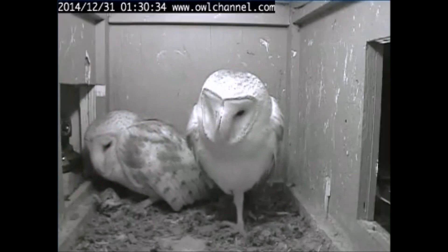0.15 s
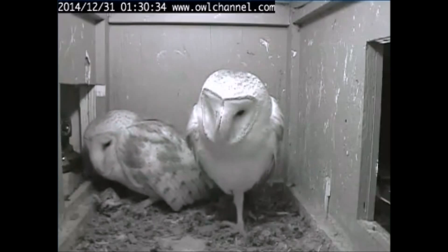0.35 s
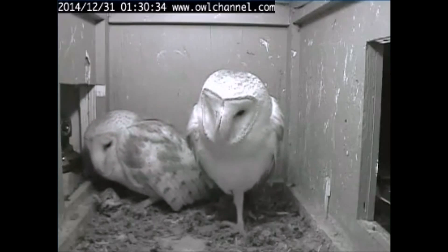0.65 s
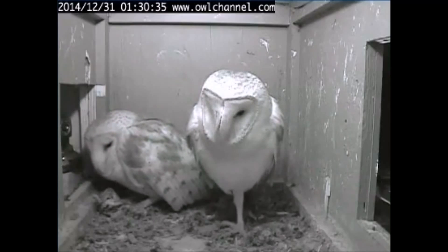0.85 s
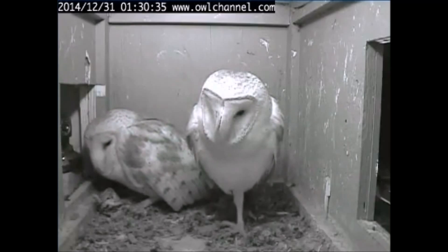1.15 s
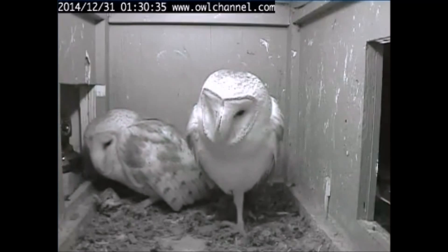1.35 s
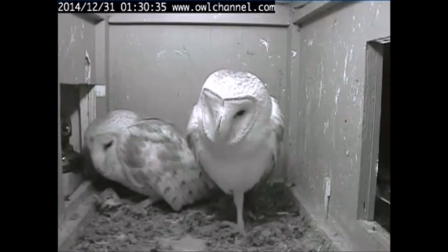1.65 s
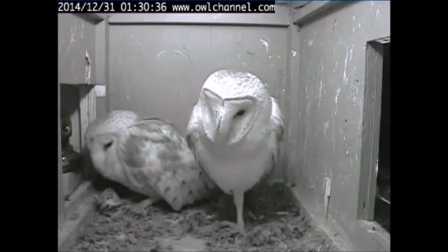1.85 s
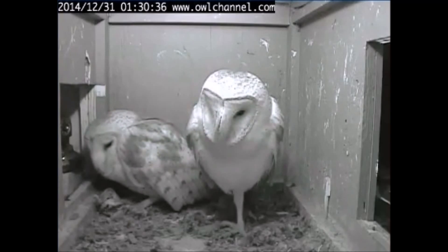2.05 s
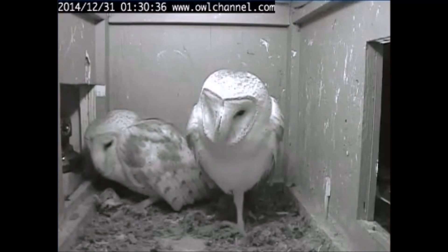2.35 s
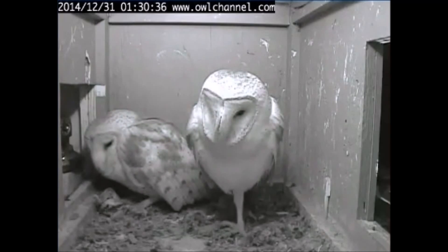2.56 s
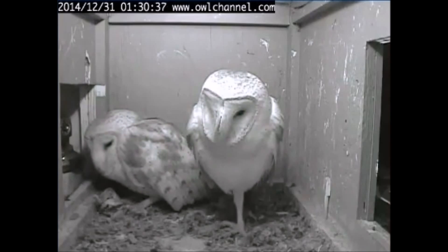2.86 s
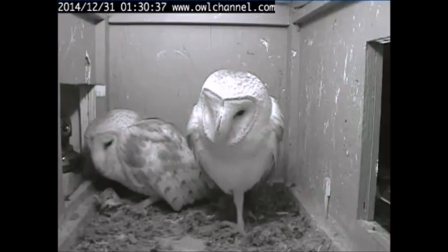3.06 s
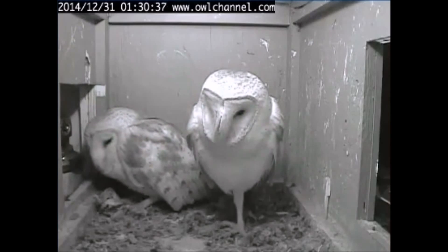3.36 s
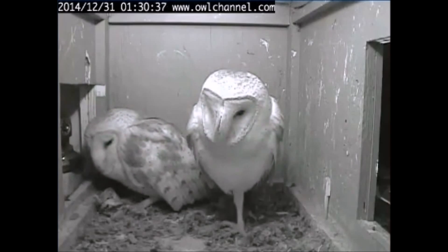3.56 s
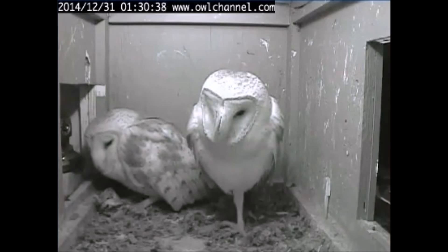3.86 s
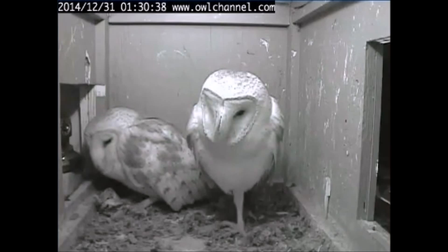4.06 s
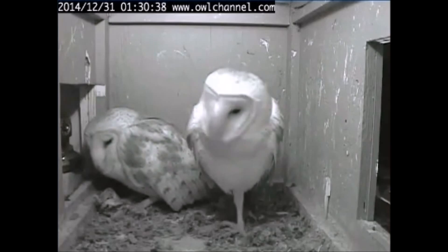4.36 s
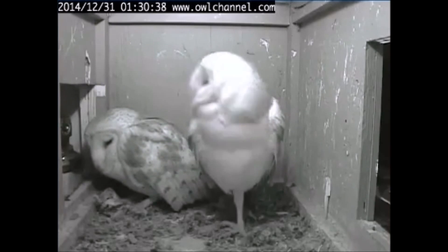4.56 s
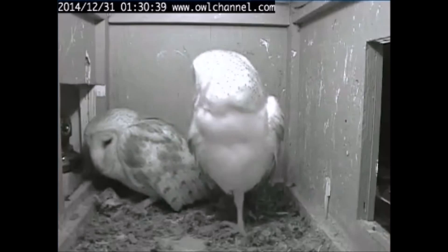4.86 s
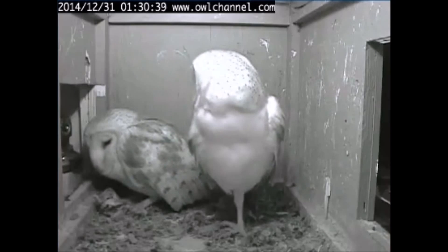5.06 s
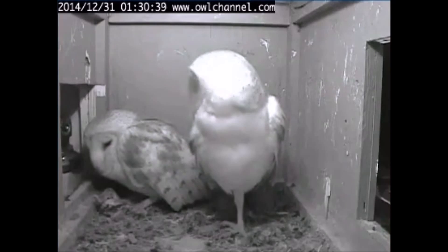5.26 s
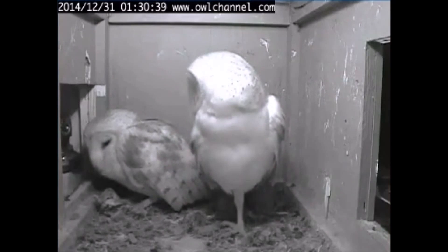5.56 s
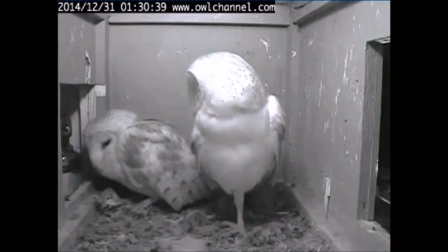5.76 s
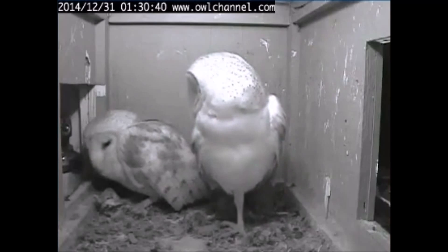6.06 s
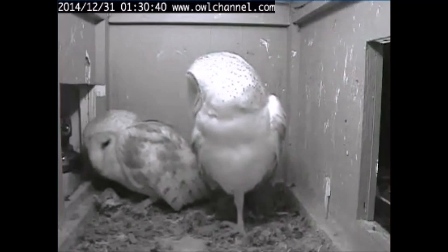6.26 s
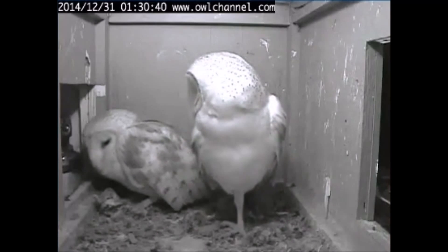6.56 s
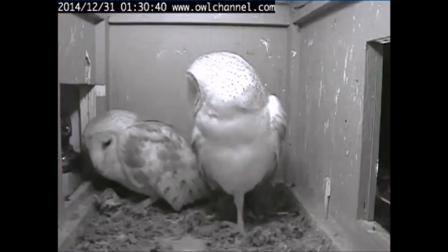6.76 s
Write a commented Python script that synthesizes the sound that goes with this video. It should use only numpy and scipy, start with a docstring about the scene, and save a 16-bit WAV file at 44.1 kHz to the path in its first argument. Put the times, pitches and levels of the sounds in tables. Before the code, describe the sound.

Barn owls call in a small wooden nest box that gives each sound a brief ring. Faint distant traffic and a low rumble run underneath throughout, swelling gently. A tiny squeak sounds at the very start. Three short calls follow at about 0.5, 1.3 and 2.2 seconds, each a thin, high, wavering whistle that breaks into a harsh breathy rasp and ends in a falling squeak; the third is mostly rasp. From 2.6 to 4.2 seconds only the background remains. Two louder rising whistles come at about 4.2 and 5.1 seconds, each ending in a quick downward squeak, the second peaking sharply near 5.5. At 5.9 a whistle with a strong rasp in its middle ends in another squeak. A last rasp runs from 6.7 seconds to the end, near 7. The microphone has little high treble and overloads slightly on the loudest peaks.

```python
"""Barn owls call in a small wooden nest box at night, with far traffic and a low rumble behind them.
A short squeak comes first. Three calls follow, each a whistle that breaks into a harsh rasp and ends
in a falling squeak. After a pause come two rising whistles and a mixed call, each ending in a squeak,
then one last rasp. The owls' breath shakes thin membranes in the throat, and the air in the box rings.
A narrow-band microphone feeds a recorder that overloads on the loudest peaks."""
import sys
import numpy as np
from scipy import signal
from scipy.fft import rfft, irfft, next_fast_len
from scipy.io import wavfile
from scipy.ndimage import uniform_filter1d

SR = 44100
rng = np.random.default_rng(int(sys.argv[2]) if len(sys.argv) > 2 else 0)


def store_wav(level_fs):
    """Save 16-bit WAV to argv[1]."""
    pcm = np.round(np.clip(np.atleast_2d(level_fs), -1, 1) * 32767)
    wavfile.write(sys.argv[1], SR, pcm.T.astype(np.int16))


N = 305172
TIME_S = np.arange(N) / SR
FADED_DB = -27.5   # how much quieter a note is at its faded ends


def amp(db):
    """Turn decibels into a number to multiply a sound by."""
    return 10 ** (np.asarray(db) / 20)


def unit_power(x):
    """Scale a sound so that its average power is 1."""
    return x / np.sqrt(np.mean(x ** 2) + 1e-20)


def gain_at(spectrum, hz):
    """Look up the gain at a pitch in rows of (pitch_hz, level_db); every octave is equally wide."""
    pitch_hz, level_db = np.transpose(spectrum)
    return amp(np.interp(np.log(hz + 1e-3), np.log(pitch_hz), level_db))


def filtered(x, response):
    """Turn each frequency of a sound up or down by response(hz)."""
    size = next_fast_len(N + SR // 4)
    hz = np.arange(size // 2 + 1) * SR / size
    return irfft(rfft(x, size) * response(hz), size)[:N]


def noise(spectrum):
    """Noise of power 1; the spectrum sets only its tone colour."""
    return unit_power(filtered(rng.standard_normal(N), lambda hz: gain_at(spectrum, hz)))


def drift(rate_hz):
    """A smooth random wobble about 1 in size; a higher rate wobbles faster."""
    pole = np.exp(-2 * np.pi * rate_hz / SR)
    return unit_power(signal.lfilter([1], [1, -2 * pole, pole * pole], rng.standard_normal(N + SR))[SR:])


# How loud the traffic is over time: time_s, wash_db, tyre_db
TRAFFIC_LEVELS = [(0, -33.5, -41), (.7, -30.5, -37.5), (1.7, -33, -42), (2.4, -33.5, -38), (3.6, -30, -37),
                  (4.3, -31.5, -40.5), (5.9, -34, -39), (6.92, -29.5, -40)]
# Tone colours of the traffic's wash, tyre hiss, drone and rumble: pitch_hz, level_db
WASH_COLOUR = [(190, -51), (330, -23), (386, -19.5), (471, -13.5), (556, -1), (637, -8), (799, -10.5),
               (904, -4), (989, 2.5), (1130, -1.5), (1220, -12.5), (1360, 1.5), (1700, -13), (2210, -43.5),
               (3740, -120)]
TYRE_COLOUR = [(1000, -31), (1700, -9), (1870, -2.5), (1970, 0), (2060, -10.5), (2240, -4.5), (2390, -16),
               (2800, -12.5), (2970, -15), (3130, -13), (3350, -17), (3960, -39.5), (4470, -44.5),
               (5810, -82.5), (9830, -120)]
DRONE_COLOUR = [(65, -34), (110, -5), (124, -7), (200, -2), (291, -8.5), (328, -10.5), (382, -1),
                (480, -4.5), (620, -35.5), (1060, -120)]
RUMBLE_COLOUR = [(7.1, -61), (12, -23.5), (27, -17.5), (54, 1.5), (70, 6), (89, 3), (119, -28), (130, -9.5),
                 (170, -67), (290, -120)]
def far_traffic():
    """Traffic and a deep rumble come through the walls as four noises that slowly swell."""
    time_s, wash_db, tyre_db = np.transpose(TRAFFIC_LEVELS)
    wash = amp(np.interp(TIME_S, time_s, wash_db) + 1.1 * drift(1.9)) * noise(WASH_COLOUR)
    tyres = amp(np.interp(TIME_S, time_s, tyre_db) + 0.84 * drift(5.8)) * noise(TYRE_COLOUR)
    drone = amp(-45 + 0.6 * TIME_S) * noise(DRONE_COLOUR)   # grows 0.6 dB each second
    rumble = amp(-32 + 1.2 * drift(2.1)) * noise(RUMBLE_COLOUR)
    return wash + tyres + drone + rumble


# The overtone one octave up, strong in low notes and faint in high ones: pitch_hz, overtone_db
OVERTONE = [(1300, 5), (1850, -10), (2150, -28)]
TAUT_HZ = 2510   # below this pitch the membranes are slack: they tremble more and leak more air
def owl_voice(notes, breath_colour, tremble, wobble_hz, flutter_db):
    """Membranes swing as air hisses past. A note is a list of (time_s, pitch_hz, tone_db, breath_db)."""
    time_s, *columns = np.transpose(np.concatenate(notes))
    curves = [np.interp(TIME_S, time_s, column) for column in columns]
    hz, tone_db, breath_db = [uniform_filter1d(c, SR // 250) for c in curves]   # muscles need 4 ms
    sounding = sum((TIME_S >= note[0][0]) & (TIME_S < note[-1][0]) for note in notes)
    on_off = uniform_filter1d(np.minimum(sounding, 1.), int(0.0047 * SR), mode="nearest")   # soft edges
    pitch_wobble = tremble * (TAUT_HZ / hz) ** 2 * drift(wobble_hz)
    phase = 2 * np.pi * np.cumsum(hz * (1 + pitch_wobble)) / SR
    tone = np.sin(phase) + gain_at(OVERTONE, hz) * np.sin(2 * phase)
    flutter = amp(flutter_db * np.tanh(drift(wobble_hz)))
    breath = amp(breath_db) * noise(breath_colour)
    return on_off * flutter * (np.sqrt(2) * amp(tone_db) * tone + breath)


# Tone colour of the breath in squeaks and rasps: pitch_hz, level_db
HARSH_BREATH = [(1000, -48.5), (1300, -20.5), (1800, 5), (2600, 6), (3500, -2.5), (5000, -3.5)]
# Falling squeaks: start_s, length_s, top_hz, bottom_hz, level_db, breath_db
SQUEAK_NOTES = [(0, 0.037, 1640, 1347, -20, -24.5), (.87, .07, 1747, 1592, -31.5, -33),
                (1.626, .06, 1725, 1460, -22, -36), (2.5, .072, 1800, 1331, -21, -33.5),
                (4.547, .062, 2682, 1603, -21, -19.5), (5.458, 0.047, 2442, 1335, -10, -21),
                (6.251, .053, 2485, 1317, -15, -29)]
def squeaks():
    """The pitch drops, with most breath half-way down, then rests low and fades."""
    fall_share, sag_db = .72, -5.5
    notes = []
    for start_s, length_s, top_hz, bottom_hz, db, breath_db in SQUEAK_NOTES:
        fall_s = fall_share * length_s
        notes.append([(start_s, top_hz, db, breath_db + FADED_DB / 2),
                      (start_s + fall_s / 2, (top_hz + bottom_hz) / 2, db + sag_db / 2, breath_db),
                      (start_s + fall_s, bottom_hz, db + sag_db, breath_db + FADED_DB / 2),
                      (start_s + length_s, bottom_hz, db + FADED_DB, breath_db + FADED_DB)])
    return owl_voice(notes, HARSH_BREATH, tremble=.022, wobble_hz=200, flutter_db=3.5)


# Tone colour of the breath in whistles: pitch_hz, level_db
SOFT_BREATH = [(1500, -12.5), (2000, -3.5), (2900, -0.5), (3300, 4.5), (3650, 9), (5000, -6.5)]
# Whistles, one list of points for each: time_s, pitch_hz, level_db
WHISTLE_NOTES = [
    [(.53, 2228, -22.5), (.545, 2204, -17), (.56, 2102, -19.5), (.578, 2103, -16.5), (.595, 2270, -22),
     (.66, 2330, -23.5), (.69, 2290, -21), (.72, 2250, -27), (.87, 2450, -25)],
    [(1.315, 2465, -22), (1.33, 2520, -15.5), (1.35, 2650, -30.5), (1.37, 2541, -19.5), (1.41, 2550, -27.5),
     (1.45, 2400, -33.5), (1.5, 2445, -22.5), (1.58, 2490, -33)],
    [(2.198, 2473, -24.5), (2.218, 2499, -27)],
    [(4.23, 1920, -30), (4.265, 2107, -22), (4.285, 2116, -16.5), (4.33, 2400, -25), (4.36, 2509, -20),
     (4.39, 2540, -23), (4.45, 2492, -19), (4.472, 2556, -11), (4.49, 2670, -19.5), (4.542, 2883, -16.5)],
    [(5.125, 2461, -18), (5.14, 2525, -15), (5.16, 2450, -20), (5.21, 2492, -14), (5.228, 2440, -24.5),
     (5.243, 2550, -18.5), (5.27, 2498, -25.5), (5.35, 2540, -12.5), (5.405, 2770, -10.5),
     (5.42, 2750, -11.5), (5.432, 2850, -9), (5.446, 2870, -8), (5.461, 2536, -5)],
    [(5.912, 2447, -27), (5.93, 2492, -25.5), (5.955, 2390, -34.5), (5.985, 2336, -18.5),
     (6.005, 2509, -32.5), (6.06, 2536, -25), (6.09, 2487, -17), (6.16, 2574, -18), (6.19, 2724, -21),
     (6.238, 2762, -21.5), (6.253, 2524, -14)],
]
def whistles():
    """Each whistle scoops up with a puff of air, follows its points and fades."""
    fade_in_s, fade_out_s, scoop_hz = .017, .016, 179.9
    puff_db, puff_s, leak_db_per_khz = 10.5, .018, 13.5
    notes = []
    for points in WHISTLE_NOTES:
        (start_s, first_hz, first_db), (end_s, last_hz, last_db) = points[0], points[-1]
        average_db = np.mean(points, axis=0)[2]
        breath_db = -51 + 2.5 * (average_db + 20)   # louder notes leak more breath
        note = [(start_s - fade_in_s, first_hz - scoop_hz, first_db + FADED_DB, breath_db + puff_db)]
        for time_s, hz, db in points:
            puff_left_db = puff_db * np.exp((start_s - time_s) / puff_s)
            leak_db = leak_db_per_khz * max(TAUT_HZ - hz, 0) / 1e3
            note.append((time_s, hz, db, breath_db + puff_left_db + leak_db))
        note.append((end_s + fade_out_s, last_hz, last_db + FADED_DB, breath_db))
        notes.append(note)
    return owl_voice(notes, SOFT_BREATH, tremble=.017, wobble_hz=120, flutter_db=3.6)


# Clean slides that join the whistles: start_s, length_s, from_hz, to_hz, level_db
SECOND_NOTES = [(0.567, 0.034, 2340, 2440, -22.5), (1.329, .095, 2270, 2337, -28.5),
                (4.3, .035, 2200, 2022, -26.5), (4.43, .115, 2560, 2920, -23),
                (5.243, .19, 2670, 2933, -20), (6.005, 0.078, 2420, 2462, -19),
                (6.16, .085, 2620, 2497, -23)]
def second_voice():
    """The other half of the voice box joins in, a little apart in pitch."""
    fade_s = .005
    notes = []
    for start_s, length_s, from_hz, to_hz, db in SECOND_NOTES:
        end_s = start_s + length_s
        times = [start_s, start_s + fade_s, end_s - fade_s, end_s]
        pitches = np.interp(times, [start_s, end_s], [from_hz, to_hz])
        edge_db, breath_db = db + FADED_DB / 2, db + 2 * FADED_DB
        notes.append(list(zip(times, pitches, [edge_db, db, db, edge_db], [breath_db] * 4)))
    return owl_voice(notes, SOFT_BREATH, tremble=.018, wobble_hz=120, flutter_db=3.4)


# Rasps, one list of points for each: time_s, pitch_hz, breath_db
RASP_NOTES = [
    [(.697, 1850, -18.5), (.731, 1720, -22), (.785, 1855, -23), (.815, 1828, -22), (.87, 1850, -26),
     (.91, 1696, -27)],
    [(1.422, 1528, -18.5), (1.446, 1707, -23), (1.515, 1810, -23.5), (1.55, 1838, -15), (1.6, 1839, -19.5),
     (1.632, 1719, -21)],
    [(2.217, 1725, -16.5), (2.26, 1776, -20), (2.305, 1834, -21), (2.35, 1760, -13.5), (2.38, 1820, -21.5),
     (2.43, 1835, -15), (2.51, 1820, -18.5), (2.53, 1693, -27)],
    [(6.065, 1770, -11.5), (6.072, 1748, -6.5), (6.084, 1740, -15.5), (6.094, 1706, -2.5),
     (6.112, 1703, -14.5), (6.128, 1813, -9), (6.16, 1775, -33)],
    [(6.655, 1733, -17), (6.675, 1690, -11), (6.72, 1630, -15), (6.748, 1606, -7), (6.758, 1622, -15),
     (6.768, 1600, -8), (6.785, 1630, -15.5), (6.834, 1700, -14), (6.885, 1717, -14.5), (6.92, 1720, -11)],
]
def rasps():
    """The owl pushes air hard; the tone starts buried in breath and slowly clears."""
    fade_in_s, fade_out_s = .0035, .02
    clearing_db = [-8, -1]   # the tone compared with the breath, at the start and the end
    notes = []
    for points in RASP_NOTES:
        (start_s, first_hz, first_db), (end_s, last_hz, last_db) = points[0], points[-1]
        opening = (start_s - fade_in_s, first_hz, first_db + FADED_DB, first_db + FADED_DB)
        body = [(s, hz, db + np.interp(s, [start_s, end_s], clearing_db), db) for s, hz, db in points]
        ending = (end_s + fade_out_s, last_hz, last_db + FADED_DB, last_db + FADED_DB)
        notes.append([opening, *body, ending])
    return owl_voice(notes, HARSH_BREATH, tremble=.012, wobble_hz=170, flutter_db=2.0)


# Where the air in the box rings: pitch_hz
RING_PITCHES = [1340, 1625, 1715, 1915, 2100, 2270, 2510, 2680, 2840, 2940, 3270, 3490, 4420]
# The shape of each of those rings: width_hz, boost_db
RING_SHAPES = [(60, 9), (50, 7.5), (50, -3), (49, 9.5), (45, 3), (55.6, 5.5), (55.3, 5.5), (49.4, -6.5),
               (58.6, -1), (53, 3.4), (64.6, 7.5), (44, -2), (162, 27)]
def nest_box(hz):
    """The box's response: its air rings briefly at certain pitches and boosts them."""
    boosts = [1 + amp(boost_db) / (1 + 2j * (hz - pitch_hz) / width_hz)
              for pitch_hz, (width_hz, boost_db) in zip(RING_PITCHES, RING_SHAPES)]
    return amp(-7.0) * np.prod(boosts, axis=0)


# How much of each pitch the microphone lets through: pitch_hz, gain_db
MICROPHONE_BAND = [(3650, 0), (3740, -6), (3810, -29), (4300, -31), (4650, -33), (4900, -50), (5300, -80)]
def microphone(sound, limit=1.1):
    """The microphone rounds off loud peaks, then loses the high treble."""
    rounded = limit * np.tanh(sound / limit)
    return filtered(rounded, lambda hz: gain_at(MICROPHONE_BAND, hz))


def scene():
    """The calls ring in the box and pass the microphone; traffic is added. Left and right are alike."""
    calls = whistles() + second_voice() + rasps() + squeaks()
    in_box = filtered(calls, nest_box)
    return np.tile(microphone(in_box) + far_traffic(), (2, 1))


# Faint copies moved in pitch: shift_hz, direction (+1 upright, -1 mirrored), gain_db
SHIFTED_COPIES = [(5292, 1, -58), (10584, 1, -60), (14112, -1, -57), (17640, -1, -63)]
def converter_copies(sound):
    """The sample-rate converter leaves faint shifted copies of the sound."""
    shiftable = signal.hilbert(sound, next_fast_len(N))[:N]
    return sum(amp(db) * (shiftable * np.exp(2j * np.pi * direction * shift_hz * TIME_S)).real
               for shift_hz, direction, db in SHIFTED_COPIES)


# Tone colour of the faint hiss that follows the loudness: pitch_hz, level_db
HISS_COLOUR = [(250, -62), (600, -40), (1200, -31.5), (2000, -1.5), (3500, -4), (4500, -12.5),
               (5500, -26.5), (15000, -37)]
def following_hiss(sound):
    """A faint hiss, separate in each channel, that rises and falls with the sound's loudness."""
    loudness = 1.6 * np.sqrt(uniform_filter1d(sound ** 2, SR // 50) + 1e-12)
    return amp(-30) * loudness * np.array([noise(HISS_COLOUR), noise(HISS_COLOUR)])


def record(dry):
    """Faint copies and hiss join the sound, the loudest peaks are flattened and the very top is cut."""
    slope = np.diff(dry[0], prepend=0)   # favours the high calls over the low rumble
    steady_hiss = amp(-93) * rng.standard_normal(N)
    clipped = np.clip(dry + converter_copies(slope) + steady_hiss, -0.95, 0.95)
    top_cut = signal.cheby2(12, 70, 15800, fs=SR, output="sos")   # 70 dB down from 15800 Hz up
    return signal.sosfilt(top_cut, clipped + following_hiss(slope))


dry = scene()
out = record(dry)
store_wav(out)
```